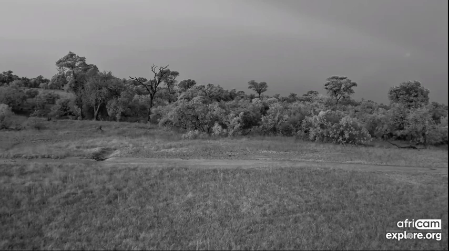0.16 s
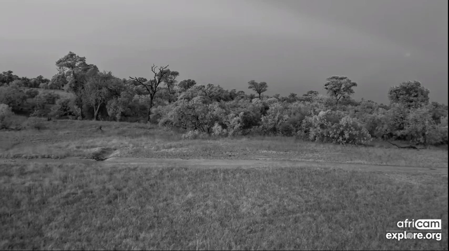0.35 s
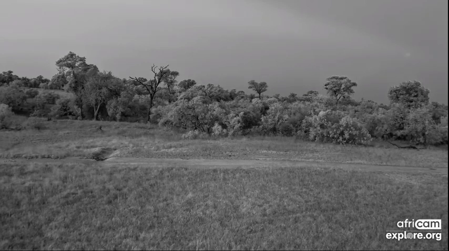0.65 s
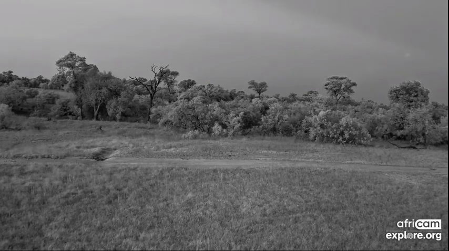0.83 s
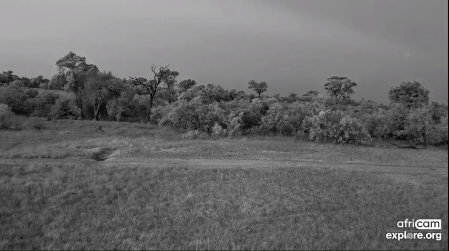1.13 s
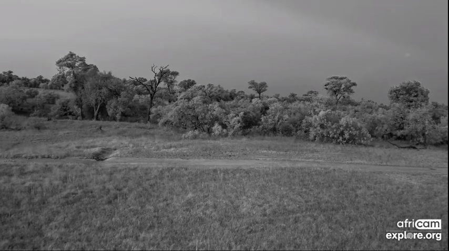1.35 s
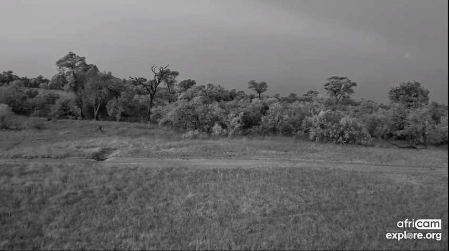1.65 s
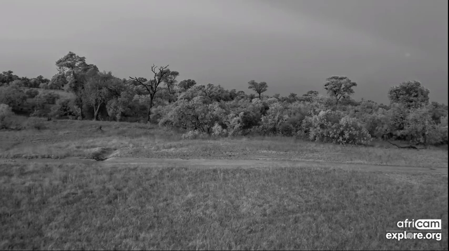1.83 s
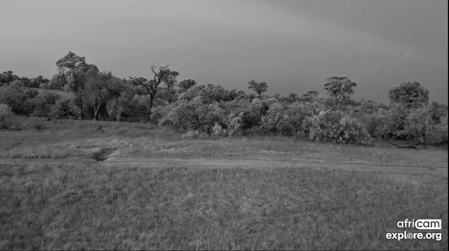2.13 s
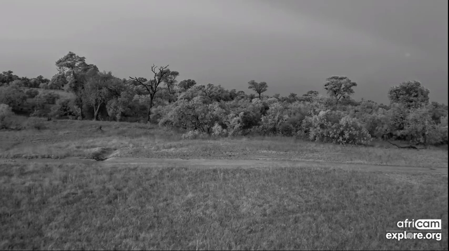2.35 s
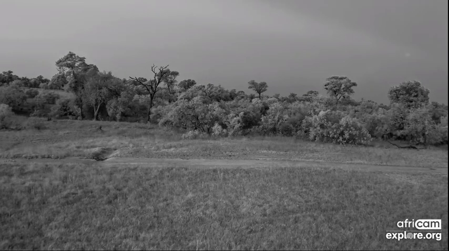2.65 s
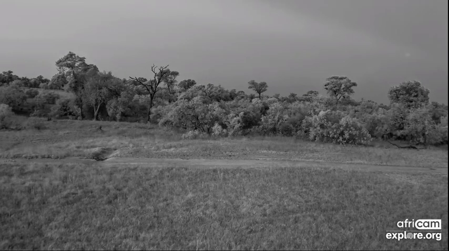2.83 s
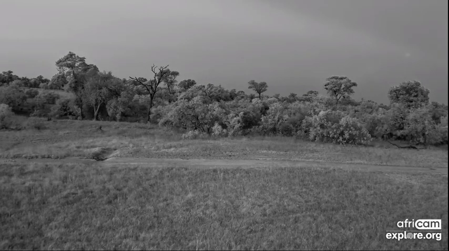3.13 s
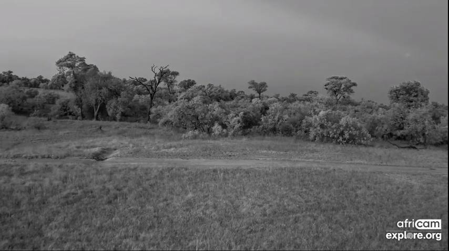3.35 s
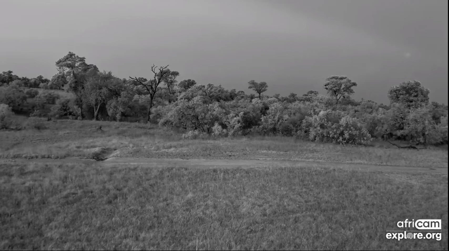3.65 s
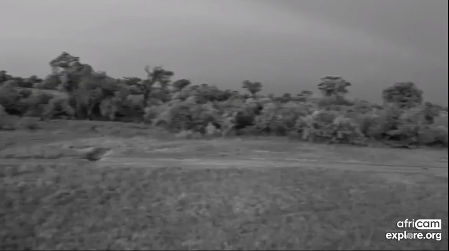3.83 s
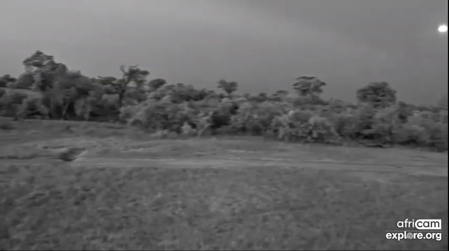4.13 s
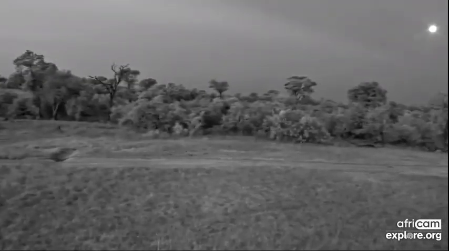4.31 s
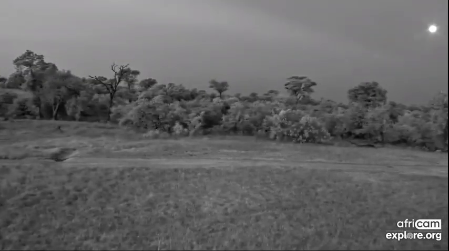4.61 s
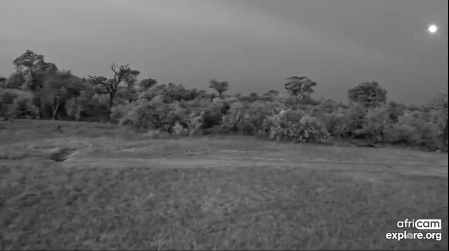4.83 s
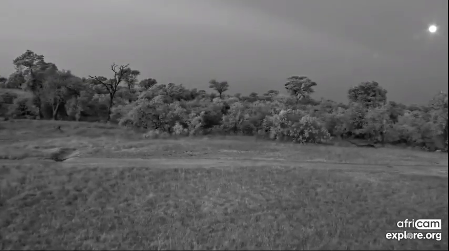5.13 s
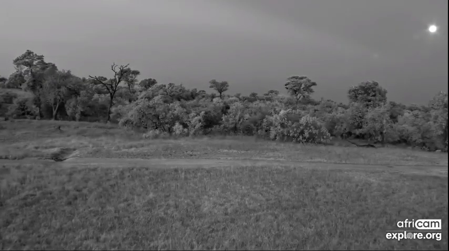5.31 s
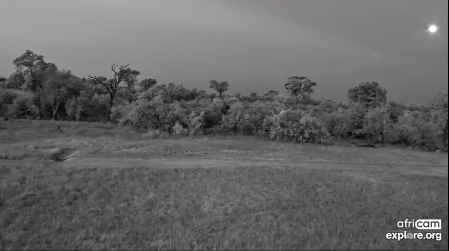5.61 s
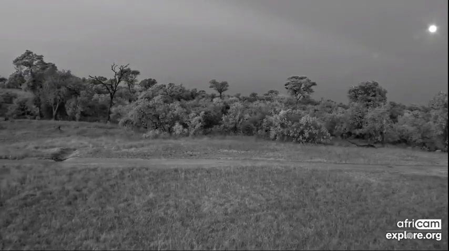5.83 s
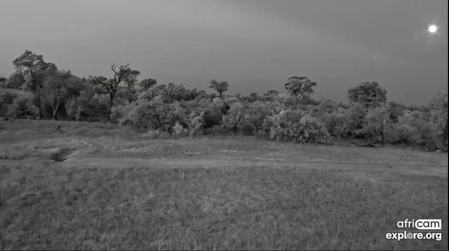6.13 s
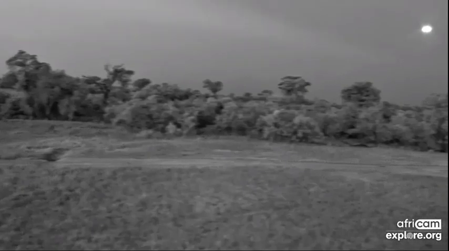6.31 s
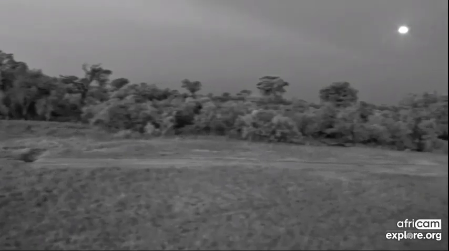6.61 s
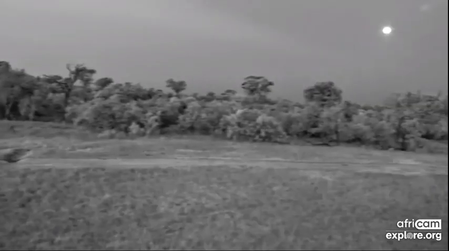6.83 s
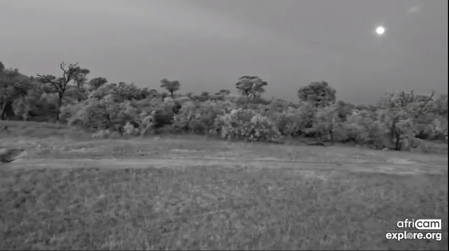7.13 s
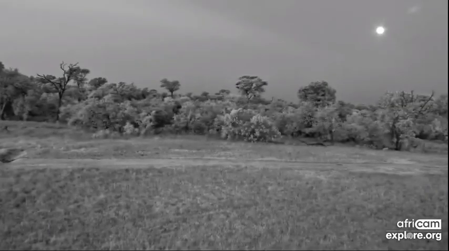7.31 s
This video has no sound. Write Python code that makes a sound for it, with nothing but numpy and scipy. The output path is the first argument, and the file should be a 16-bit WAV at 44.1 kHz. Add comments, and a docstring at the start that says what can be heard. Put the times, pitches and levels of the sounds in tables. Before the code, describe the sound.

High crickets chirr steadily in open bush at night, over a hush of air and a faint low rumble that soon fades. A rasping animal screech sounds five times, about twice a second. Four thinner, quieter squeals follow, breaking in pitch among squeaks and yelps, the last ending in a quick, sharp stutter. Faint far-off pips close the stretch. The sound is mono, with light, scattered echoes.

```python
"""An animal forces air through its throat in five harsh, breathy screeches, then gives four fainter
squeals that crack and slide in pitch, with squeaks, yelps and stutters around the calls.
Bush crickets chirr throughout, scraping file over scraper to ring their wings. Small trills, two bat
calls and distant pips whistle over the hush of night air and a low rumble that soon dies away.
The setting is open bush with thin, scattered echoes, heard in mono."""
import sys
import numpy as np
from scipy import signal
from scipy.fft import rfft, irfft
from scipy.io import wavfile

SR = 44100
rng = np.random.default_rng(int(sys.argv[2]) if len(sys.argv) > 2 else 0)


def dump_mix(stems):
    """Bounce the given channels to the path in sys.argv[1] as a 16-bit WAV at rate SR."""
    frames = np.atleast_2d(stems).T  # one column per channel
    limited = np.clip(frames, -1, 1)  # hard clip at full scale
    pcm = np.round(limited * 32767).astype(np.int16)
    wavfile.write(sys.argv[1], SR, pcm)


N = 328986
T = np.arange(N) / SR
HZ = np.fft.rfftfreq(N, 1 / SR)
HIGH_CUT_HZ = 12100

# tone of the night air: (frequency [Hz], relative level [dB])
AIR_SPECTRUM = [(20, -2.5), (50, 1), (100, -2.5), (220, -6.5), (480, 2), (800, 0), (1500, -2.5), (2400, -5),
                (2950, -4.5), (3450, 1.5), (4200, -3.5), (5800, -6.5), (8500, -6), (10000, -10)]
# fader moves on the crickets, before trim: (time [s], low wing modes [dB], high wing modes [dB])
CRICKET_LEVELS = [(0.0, -57, -61), (0.12, -60.5, -65), (0.81, -50, -56), (0.95, -54, -60), (1.06, -50, -56),
                  (1.7, -49, -57), (1.87, -43, -50), (2.29, -50, -48), (2.39, -54.5, -55),
                  (2.89, -47, -50.5), (3.07, -51, -53), (3.14, -48, -50), (3.63, -54, -60),
                  (3.93, -57, -58), (4.69, -56, -62.5), (5.55, -58, -60), (5.79, -55, -54.5),
                  (6.28, -57, -58), (6.54, -52, -53), (7.08, -59, -54.5), (7.25, -55, -49.5),
                  (7.46, -53, -54)]
# wing resonances, low and high: (frequency [Hz], width [Hz], relative level [dB])
WING_LOW_MODES = [(6660, 380, -14), (7356, 530, -6), (7530, 330, -3)]
WING_HIGH_MODES = [(8210, 550, -10.5), (8430, 55, -4), (9100, 200, -18)]
# fader moves on the rumble, before trim: (time [s], level [dB])
RUMBLE_LEVELS = [(0.0, -62), (0.65, -53.5), (1.8, -55), (2.3, -58), (2.7, -77)]
# squeaks and gasps around the louder calls:
# (start [s], end [s], start pitch [Hz], end pitch [Hz], level [dB], roughness [0-1], tilt [dB/octave])
SQUEAK_CUES = [(0.274, 0.306, 1470, 1350, -47, 0.5, -52), (.96, 1.02, 1510, 1500, -47, 0.23, -42),
               (1.185, 1.247, 4760, 5020, -30.5, 0.1, 0), (1.245, 1.26, 5700, 6300, -29, .05, 0),
               (1.541, 1.619, 1780, 1700, -44, 0.5, -40), (1.673, 1.727, 2570, 2790, -29.5, 0.13, -19),
               (2.022, 2.054, 1550, 1510, -40.5, 0.3, -52), (2.711, 2.735, 2820, 2770, -36, .14, -14),
               (2.73, 2.832, 1720, 1740, -41, 0.81, -20), (3.011, 3.052, 1880, 1650, -53, 0.34, -40),
               (5.129, 5.156, 1770, 1655, -45, 0.46, -27), (5.176, 5.198, 2740, 2600, -46, .2, -8),
               (5.341, 5.372, 4300, 5200, -46, .2, 0), (5.783, 5.806, 3800, 2350, -31.5, 0.16, -20),
               (6.106, 6.137, 1900, 1707, -42.5, 0.8, -23)]
# throat colour of the pitched calls: (frequency [Hz], relative level [dB])
VOICE_COLOUR = [(1000, -36.5), (1450, -36), (1900, -8.5), (2300, -9.5), (2750, -1), (3400, 13.5),
                (3900, -7.5), (4500, -1.5), (5250, -2.5), (6200, -12), (7200, -24), (9000, -103)]
# screeches, with the upper throat and top hiss set against the lower throat, before trim:
# (start [s], release [s], attack [s], effort [dB], upper throat [dB], top hiss [dB])
SCREECH_CUES = [(0.488, 0.846, .16, -20.5, -4.3, -33), (1.11, 1.312, 0.008, -21, -8.8, -27),
                (1.61, 1.8, 0.0082, -20, -5.2, -25), (2.055, 2.237, .009, -20.5, -6, -25.5),
                (2.506, 2.695, 0.0084, -21, -5.2, -24.5)]
# throat resonances of a screech, in three bands: (frequency [Hz], width [Hz], relative level [dB])
THROAT_LOWER_MODES = [(727, 116, -17), (870, 130, -15.5), (1059.5, 134, 2), (1283, 182, 0.5),
                      (1890, 450, -17)]
THROAT_UPPER_MODES = [(2577, 270, -15), (3076, 200, -6.5), (3358, 274, 0.5), (3740, 360, -15),
                      (4340, 400, -19.5), (4560, 750, -20)]
THROAT_TOP_MODES = [(4840, 500, -27), (5570, 660, -2), (6360, 800, -11)]
# bands that side cavities swallow from a screech: (frequency [Hz], half width [Hz], gain [dB])
CAVITY_NOTCHES = [(1670, 75, -1), (2200, 100, -3.5), (2764, 92, -24)]
# trills: (start [s], end [s], chirp spacing [s], level at full swell [dB])
TRILL_CUES = [(1.832, 2.023, 0.017, -44.5), (3.01, 3.248, 0.019, -44), (6.405, 6.531, .018, -45.5)]
# squeals, four groups each: timing (start [s], crack [s], end [s]), whine,
# crack (pitch [Hz], level [dB]), rasp;
# whine and rasp are (pitch [Hz], level [dB], roughness [0-1], tilt [dB/octave])
SQUEAL_CUES = [((4.07, 4.2, 4.235), (2735, -40, .25, 0), (1436, -26), (1698, -31, .8, 4)),
               ((4.465, 4.598, 4.639), (2630, -45, .24, 11), (1650, -30.5), (1681, -33, .38, 4)),
               ((5.175, 5.326, 5.437), (2510, -49.5, .24, 12), (1680, -34), (1709.5, -39.5, .38, 12)),
               ((5.73, 5.8, 5.906), (1539.5, -37.5, .12, 33), (1200, -31), (1865, -35.5, .25, -4))]
# keyframes of two arching yelps that run on from the first and last squeals:
# (time [s], pitch [Hz], level [dB], roughness [0-1], tilt [dB/octave])
YELP_KEYFRAMES = [
    [(4.228, 1954, -36, .7, 5), (4.257, 2170, -38.5, 0.3, 0), (4.28, 1512, -33.5, 0.3, -22),
     (4.315, 1364, -30.5, 0.16, -15.5), (4.362, 1325, -41.5, 0.22, -14)],
    [(5.909, 3010, -24.5, .17, -5), (5.92, 3210, -27.5, 0.27, -10), (5.945, 4060, -39, .65, 0),
     (5.97, 4840, -41, 0.53, 0), (6.018, 4370, -38.5, 0.5, 0)],
]
# pulses that end the second and last squeals:
# (start [s], length [s], start pitch [Hz], end pitch [Hz], level [dB])
STUTTER_CUES = [(4.645, .026, 1676, 1716, -26), (4.67, 0.028, 1713, 1713, -31),
                (6.02, 0.019, 4320, 4330, -28), (6.039, 0.017, 4035, 3780, -21),
                (6.063, .021, 3790, 3630, -18.5), (6.085, .017, 3750, 3230, -28)]
# bat calls: (start [s], length [s], start pitch [Hz], end pitch [Hz], level [dB])
BAT_CUES = [(5.188, 0.043, 11400, 10700, -52), (6.251, .03, 11930, 11500, -51)]
# distant pips: (start [s], end pitch [Hz], level [dB])
PIP_CUES = [(6.41, 2220, -54), (6.55, 2090, -56), (6.725, 2450, -60), (6.841, 2340, -58),
            (6.989, 2650, -56), (7.112, 2540, -57), (7.239, 2500, -56)]


def gain_of(db):
    """Decibels to gain."""
    return 10 ** (np.asarray(db) / 20)


def unit_rms(x):
    """Normalise to rms 1."""
    return x / np.sqrt(np.mean(abs(x) ** 2) + 1e-20)


def eq_db(curve, hz):
    """An EQ curve's level at hz, on a log-frequency axis."""
    curve_hz, db = np.transpose(curve)
    return np.interp(np.log(hz + 1), np.log(curve_hz + 1), db)


def add(mix, start, sound):
    """Drop a sound into the mix at its start time."""
    part = mix[max(round(start * SR), 0):][:len(sound)]
    part += sound[:len(part)]


def noise(spectrum, n=N):
    """Coloured noise of rms 1."""
    return unit_rms(irfft(rfft(rng.standard_normal(n)) * spectrum, n))


def wobble(t, hz):
    """Smooth random modulation of rms 1, moving at up to about hz."""
    lowpass = signal.butter(2, hz, fs=SR, output="sos")
    return unit_rms(signal.sosfilt(lowpass, rng.standard_normal(len(t) + SR // 10))[-len(t):])


def resonances(modes):
    """Frequency response of a bank of steep resonances."""
    peaks = (gain_of(db) / (1 + (2 * (HZ - hz) / width) ** 2) for hz, width, db in modes)
    return np.sqrt(sum(peak ** 2 for peak in peaks))


def night_air(level_db=-48.5, flicker_db=0.47):
    """The bed: a broad hush of air whose level flickers slightly."""
    return gain_of(level_db + flicker_db * wobble(T, 30)) * noise(gain_of(eq_db(AIR_SPECTRUM, HZ)))


def crickets(stroke_hz=38.55, tooth_hz=431, sag=0.025, low_trim_db=-1.44, high_trim_db=-3):
    """Each wing stroke drags a file over a scraper, slowing as it goes; the teeth ring the wing."""
    strokes = np.cumsum(stroke_hz * (1 + .008 * wobble(T, 13))) / SR
    index, phase = strokes.astype(int), strokes % 1
    speed, force_db = rng.standard_normal((index[-1] + 1, 2))[index].T
    teeth = tooth_hz * (1 + 0.0013 * speed) * (phase - sag * phase ** 2 / 2) / stroke_hz
    closing = np.sqrt(np.sin(np.pi * np.minimum(phase / .76, 1)).clip(0))  # the return is silent
    strikes = unit_rms(sum(np.cos(2 * np.pi * k * teeth) for k in range(15, 23)))
    scrape = rfft(closing * gain_of(force_db) * (strikes + 0.89 * rng.standard_normal(N)))
    low_ring = unit_rms(irfft(scrape * resonances(WING_LOW_MODES), N))
    high_ring = unit_rms(irfft(scrape * resonances(WING_HIGH_MODES), N))
    times, low_db, high_db = np.transpose(CRICKET_LEVELS)
    return (gain_of(np.interp(T, times, low_db) + low_trim_db) * low_ring
            + gain_of(np.interp(T, times, high_db) + high_trim_db) * high_ring)


def rumble(trim_db=-2, surge_db=3.5):
    """A soft low rumble that comes and goes, then dies away."""
    times, levels = np.transpose(RUMBLE_LEVELS)
    level_db = np.interp(T, times, levels, right=-100) + surge_db * np.tanh(wobble(T, 7.6))
    low_end = noise(resonances([(107, 98, -6), (165, 41, 5), (263, 1200, 0)]))
    return gain_of(level_db + trim_db) * low_end


def bush_echoes(x, decay_s, predelay_s, taps_per_s=2000):
    """Thin, scattered reflections that fall 60 dB in decay_s."""
    t = np.arange(SR) / SR
    taps = rng.standard_normal(SR) * (rng.random(SR) < taps_per_s / SR)
    taps *= gain_of(-60 * t / decay_s) * (t > predelay_s)
    return signal.fftconvolve(x, taps / np.linalg.norm(taps))[:N]


def squeak(start, end, start_hz, end_hz, db, rough, tilt, taper_db=4):
    """Voice keyframes for one straight glide, loudest in the middle."""
    return [(start, start_hz, db - taper_db, rough, tilt),
            ((start + end) / 2, (start_hz + end_hz) / 2, db, rough, tilt),
            (end, end_hz, db - taper_db, rough, tilt)]


def tight_voice(keyframes, throb_hz=115, throb_db=6, sway=0.0099, grain_db=2):
    """Tight vocal folds sing high; as they roughen, partials blur, the tone throbs and air leaks."""
    times, *columns = np.transpose(keyframes)
    t = np.arange(times[0], times[-1], 1 / SR)
    hz, level_db, rough, tilt_db = [np.interp(t, times, column) for column in columns]
    rough = np.clip(rough, 0, 1)
    jitter = .06 * rough * wobble(t, 400)
    cycles = np.cumsum(hz * (1 + jitter + sway * wobble(t, 44.6))) / SR
    k = np.arange(1, 6)[:, None]  # harmonic numbers
    gains = gain_of(eq_db(VOICE_COLOUR, k * hz) + tilt_db * np.log2(k)) * (k * hz < HIGH_CUT_HZ)
    # unsteady vibration spreads each partial into a band, the wider the higher it lies
    blur = np.array([wobble(t, width) + 1j * wobble(t, width) for width in .09 * k[:, 0] * hz.mean()])
    partials = (np.sqrt(2 * (1 - rough)) + np.sqrt(rough) * blur) * np.exp(2j * np.pi * k * cycles)
    tone = (gains * partials.real).sum(0) / np.linalg.norm(gains, axis=0)
    breath = noise(gain_of(eq_db(VOICE_COLOUR, np.fft.rfftfreq(len(t), 1 / SR))), len(t))
    leak = .5 * rough ** 2
    breathy_tone = np.sqrt(1 - leak) * tone + np.sqrt(leak) * breath
    throb = np.sin(2 * np.pi * np.cumsum(throb_hz * (1 + 0.22 * wobble(t, 48))) / SR)
    flutter = gain_of(np.sqrt(rough) * (throb_db * throb + grain_db * wobble(t, 70)))
    swing = unit_rms(signal.hilbert(flutter * breathy_tone))
    swing /= np.sqrt(1 + 0.23 * abs(swing) ** 2)  # the folds can only swing so far
    declick = np.clip(np.minimum(t - t[0], t[-1] - t) / .002, 0, 1)
    return declick * gain_of(level_db) * unit_rms(swing.real)


def screeches(arch_db=3.5, dull_db=2.5, release_s=0.076, cut_db_per_s=540, upper_trim_db=1,
              top_trim_db=2):
    """Turbulent air, fluttering unevenly, rushes through a wide-open throat until the breath is cut."""
    lower = noise(resonances(THROAT_LOWER_MODES))
    lower += gain_of(-46) * noise(resonances([(302, 1500, 0)]))  # a trace of chest
    upper, top = noise(resonances(THROAT_UPPER_MODES)), noise(resonances(THROAT_TOP_MODES))
    out = np.zeros(N)
    for start, release, attack, effort_db, upper_db, top_db in SCREECH_CUES:
        t = np.arange(start, release + release_s, 1 / SR)
        span = np.round(t * SR).astype(int)
        # each screech arches: slack is 0 in the middle and 1 at the weaker, duller ends
        slack = np.minimum((2 * (t - start) / (release - start) - 1) ** 2, 1)
        level_db = effort_db - arch_db * slack - cut_db_per_s * np.maximum(t - release, 0)
        breath = (1 - np.exp((start - t) / attack)) * gain_of(level_db)
        rasp = unit_rms(gain_of(-0.5 * np.tanh(wobble(t, 200))))
        hiss = gain_of(upper_db + upper_trim_db) * upper[span]
        hiss += gain_of(top_db + top_trim_db) * top[span]
        hiss *= unit_rms(gain_of(2 * np.tanh(wobble(t, 49) + .5)))  # the flow stalls more than it surges
        add(out, start, breath * rasp * (lower[span] + gain_of(-dull_db * slack) * hiss))
    notches_db = sum(db * np.exp(-((HZ - hz) / width) ** 2) for hz, width, db in CAVITY_NOTCHES)
    return irfft(rfft(out) * gain_of(notches_db), N)


def whistle(length, start_hz, end_hz, db, waver):
    """One soft-edged, wavering glide."""
    t = np.arange(0, length, 1 / SR)
    hz = np.linspace(start_hz, end_hz, len(t)) * (1 + waver * wobble(t, 300))
    envelope = gain_of(db) * np.sqrt(2) * np.sin(np.pi * t / length)
    return envelope * np.sin(2 * np.pi * np.cumsum(hz) / SR)


def trills(chirp_s=0.0143, top_hz=5400, bottom_hz=4100, swell_db=11):
    """Runs of quick falling chirps that grow louder and brighter over their first half."""
    out = np.zeros(N)
    for start, end, spacing, full_db in TRILL_CUES:
        for onset in np.arange(start, end - spacing / 2, spacing):
            weakness = max(1 - 1.96 * (onset - start) / (end - start), 0)
            start_hz = top_hz * (1 - 0.081 * weakness)
            db = full_db - swell_db * weakness + 2.3 * rng.normal()
            add(out, onset, whistle(chirp_s, start_hz, bottom_hz, db, waver=0.016))
    return out


def squeal(timing, whine, crack, rasp, sag=.018, swell_db=2.8, fade_db=9):
    """Voice keyframes for a thin whine that sinks and swells, cracks downward and settles into a rasp."""
    start, crack_time, end = timing
    hz, db, rough, tilt = whine
    crack_hz, crack_db = crack
    rasp_hz, rasp_db, rasp_rough, rasp_tilt = rasp
    return [(start, hz * (1 + sag), db - swell_db, rough, tilt),
            (crack_time - .024, hz * (1 - sag), db + swell_db, rough, tilt),
            (crack_time - .006, rasp_hz, crack_db - 8, .45, 2),  # slide into the crack
            (crack_time, crack_hz, crack_db, 0.29, -7),
            (crack_time + 0.01224, *rasp),
            (end - 0.016, *rasp),
            (end, rasp_hz, rasp_db - fade_db, rasp_rough, rasp_tilt)]


def stutter_pulse(start, length, start_hz, end_hz, db, fade_db=9, rough=.25):
    """Voice keyframes for a pulse that hits hard, then fades."""
    return [(start, start_hz, db, rough, 0), (start + length, end_hz, db - fade_db, rough, 0)]


def bats():
    """Two faint, very high whistles that slide down."""
    out = np.zeros(N)
    for start, length, start_hz, end_hz, db in BAT_CUES:
        add(out, start, whistle(length, start_hz, end_hz, db, waver=0.015))
    return out


def pips(length_s=.052, start_hz=1860):
    """Far-off piping: a string of short rising whistles."""
    out = np.zeros(N)
    for start, end_hz, db in PIP_CUES:
        add(out, start, whistle(length_s, start_hz, end_hz, db, waver=0.034))
    return out


def scene():
    """The mix: callers and their echoes over the night air, the same in both channels."""
    calls = [squeal(*cue) for cue in SQUEAL_CUES] + YELP_KEYFRAMES
    calls += [stutter_pulse(*cue) for cue in STUTTER_CUES] + [squeak(*cue) for cue in SQUEAK_CUES]
    voice = np.zeros(N)
    for keyframes in calls:
        add(voice, start=keyframes[0][0], sound=tight_voice(keyframes))
    # ground and grass near the caller thicken each glide
    voice = .9 * voice + .36 * bush_echoes(voice, decay_s=.06, predelay_s=.002)
    screech = screeches()
    whistles = trills() + pips() + bats()
    chirr = crickets()
    echo_send = (gain_of(-28.5) * screech + gain_of(-18.5) * voice
                 + gain_of(-12.5) * whistles + gain_of(-4) * chirr)
    trees = bush_echoes(echo_send, decay_s=0.54, predelay_s=0.0073)
    return np.tile(screech + voice + whistles + chirr + trees + night_air() + rumble(), (2, 1))


def record(dry):
    """A steep high cut on the master."""
    high_cut = signal.firwin(511, HIGH_CUT_HZ, window=("kaiser", 9), fs=SR)
    return signal.oaconvolve(dry, high_cut[None], "same", axes=1)


dry = scene()
out = record(dry)
dump_mix(out)
```